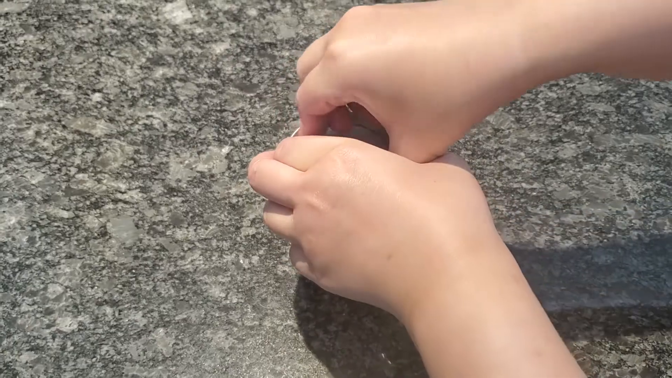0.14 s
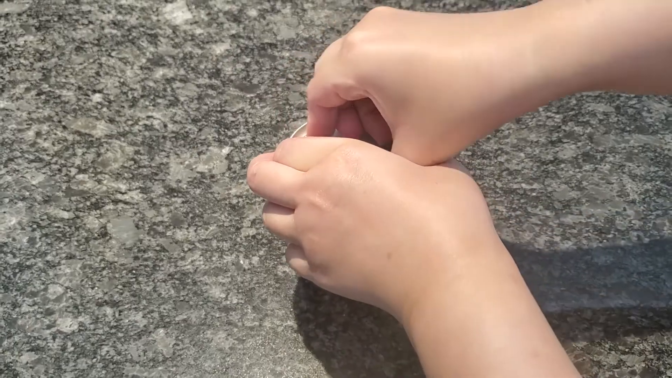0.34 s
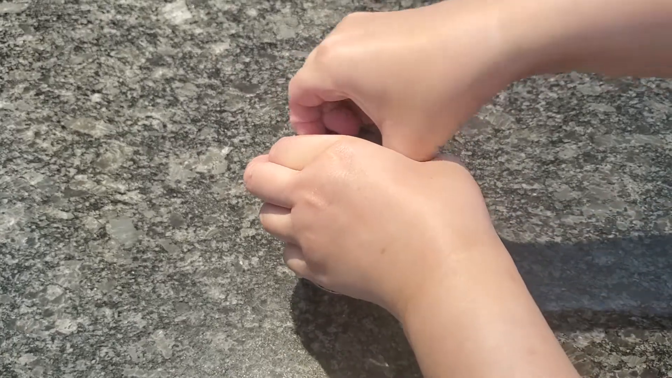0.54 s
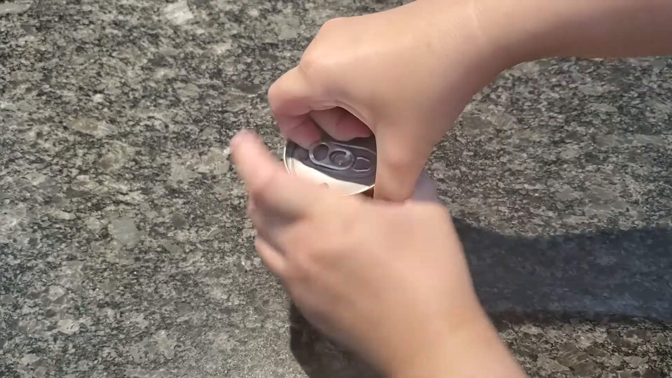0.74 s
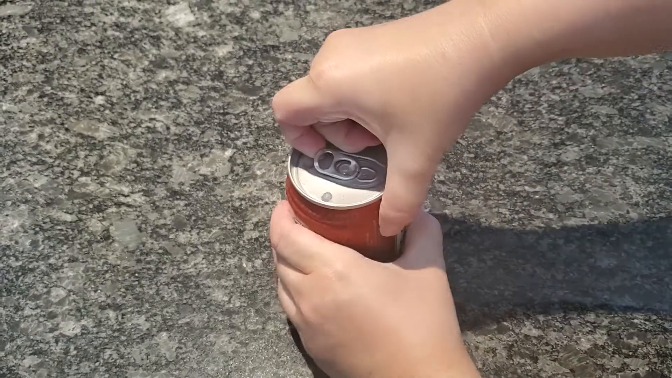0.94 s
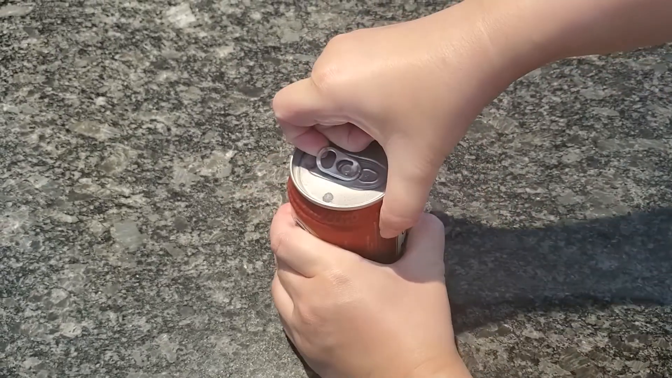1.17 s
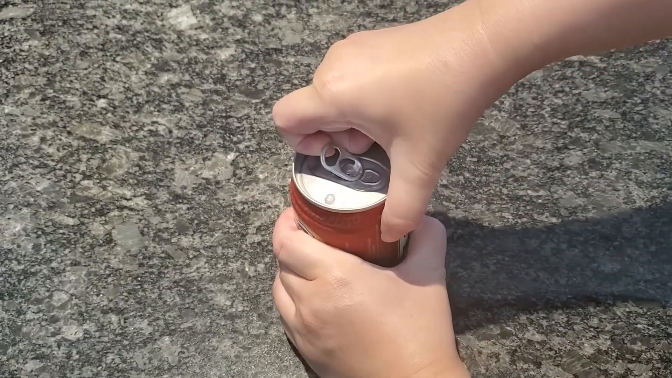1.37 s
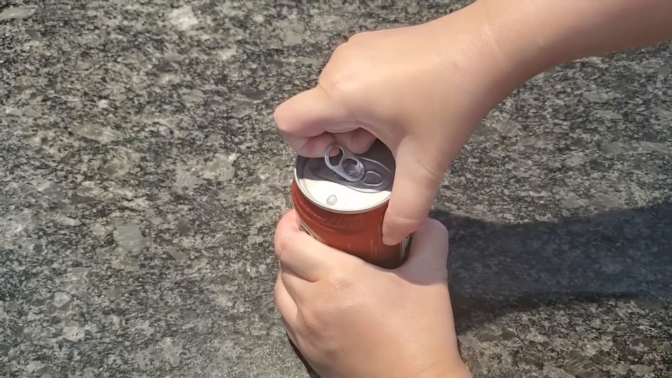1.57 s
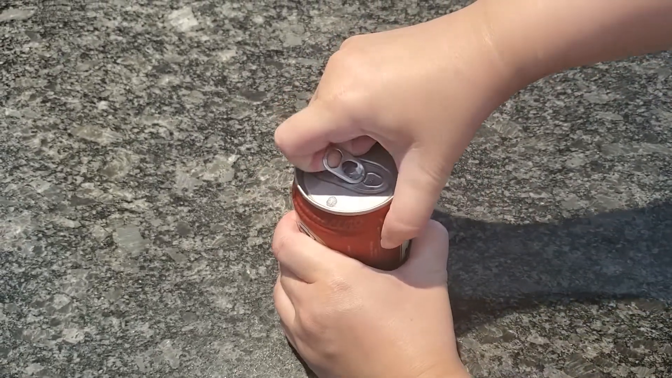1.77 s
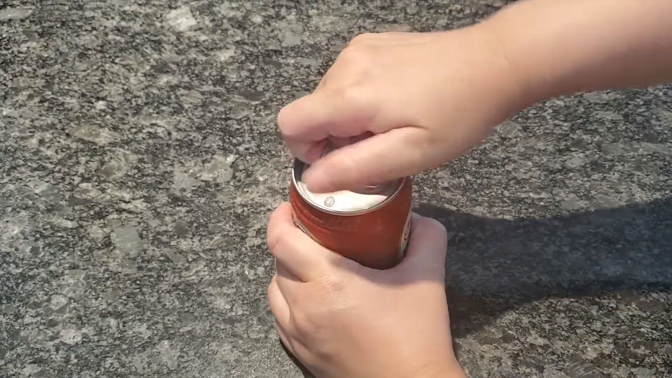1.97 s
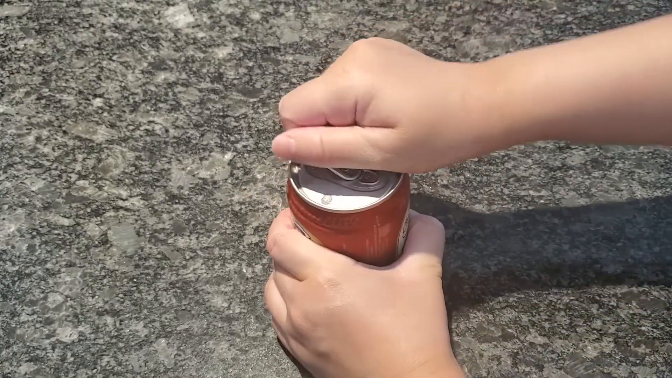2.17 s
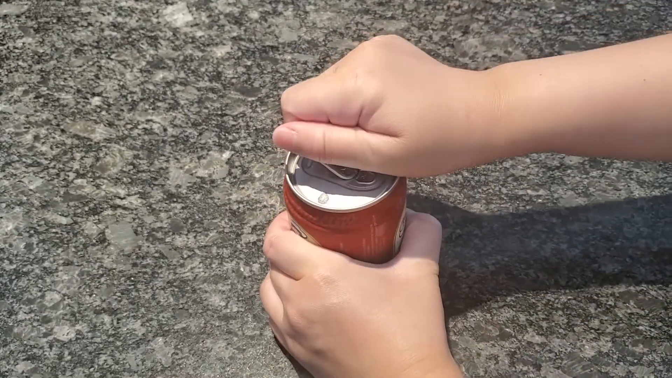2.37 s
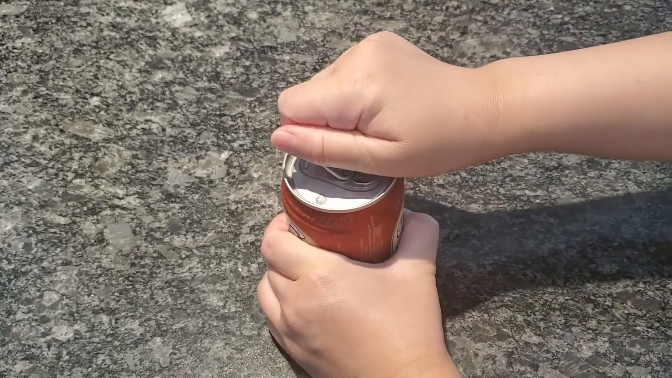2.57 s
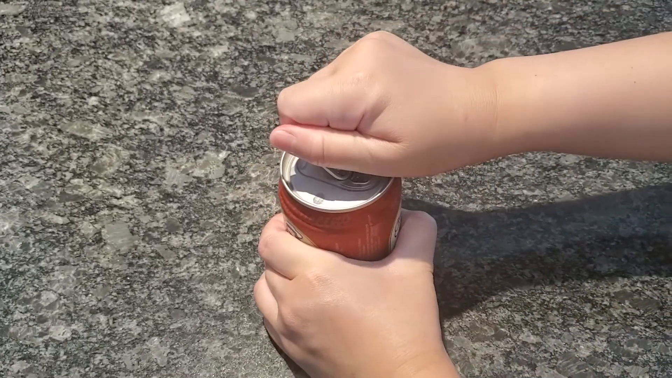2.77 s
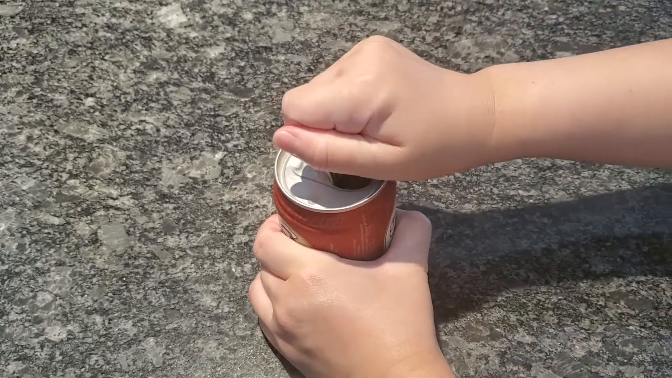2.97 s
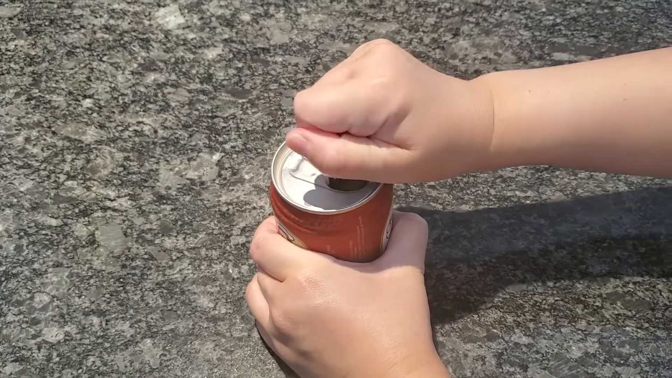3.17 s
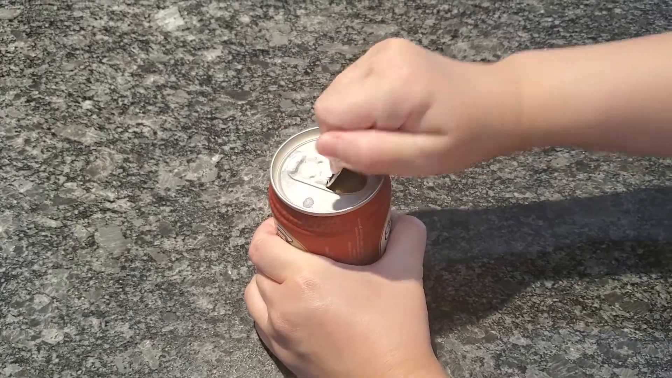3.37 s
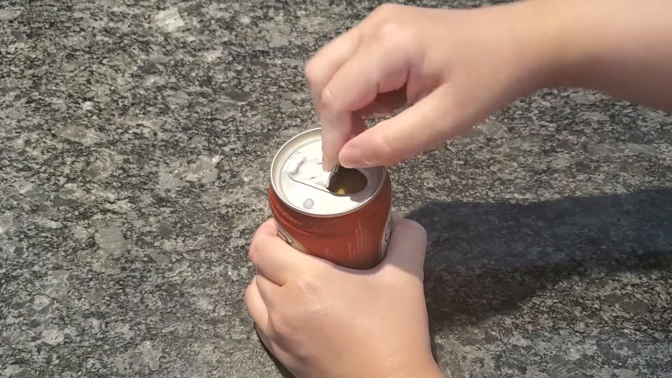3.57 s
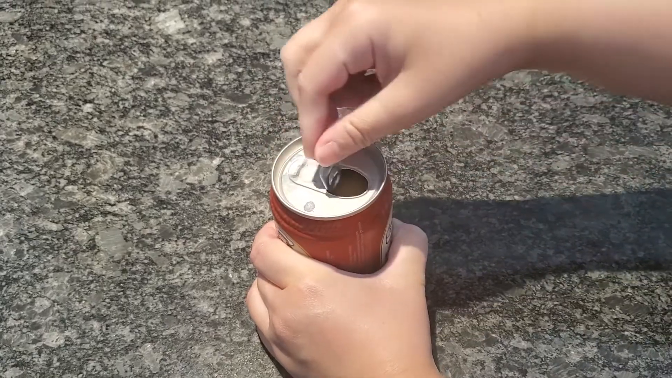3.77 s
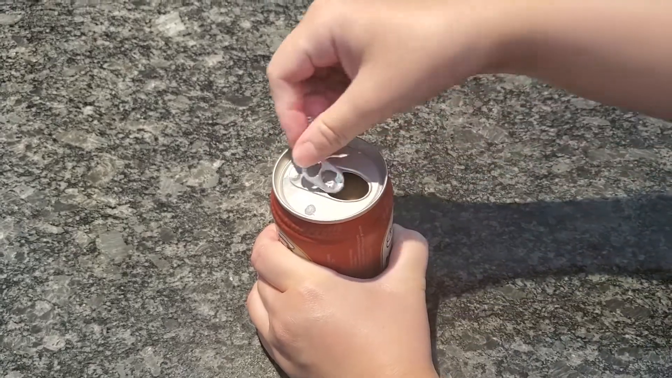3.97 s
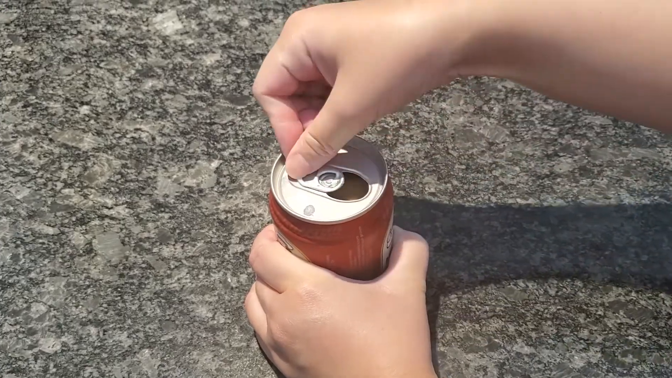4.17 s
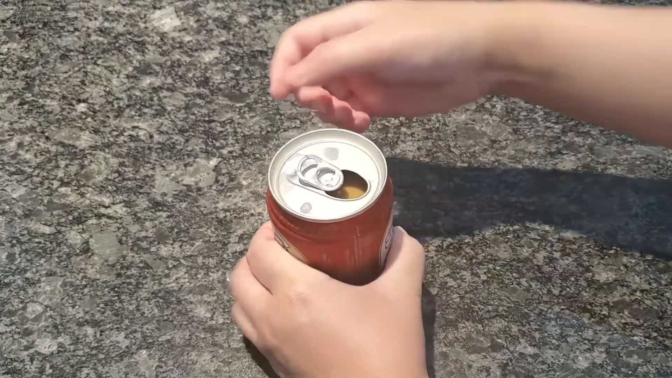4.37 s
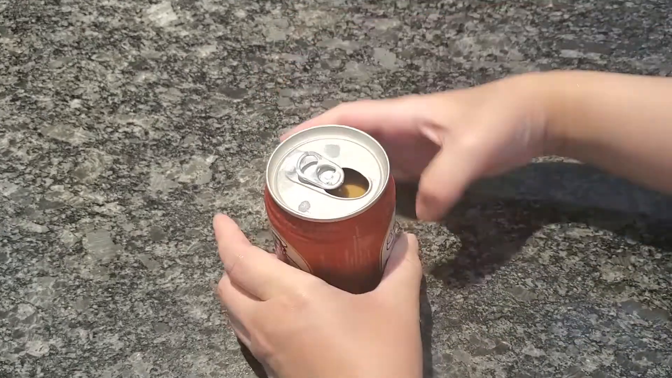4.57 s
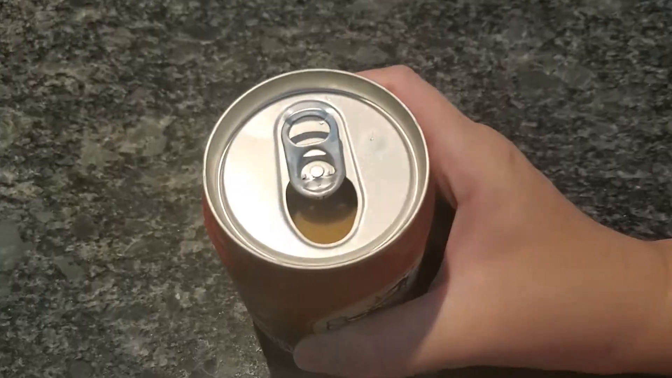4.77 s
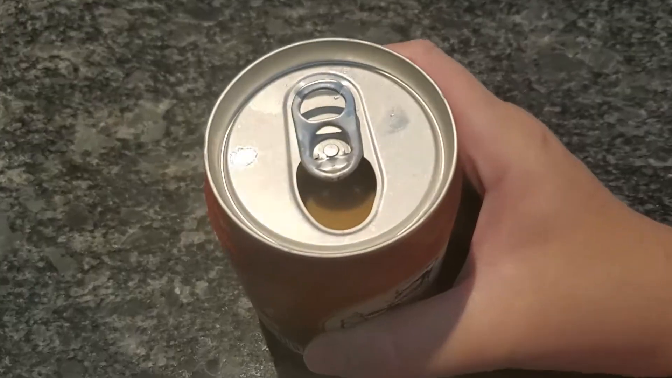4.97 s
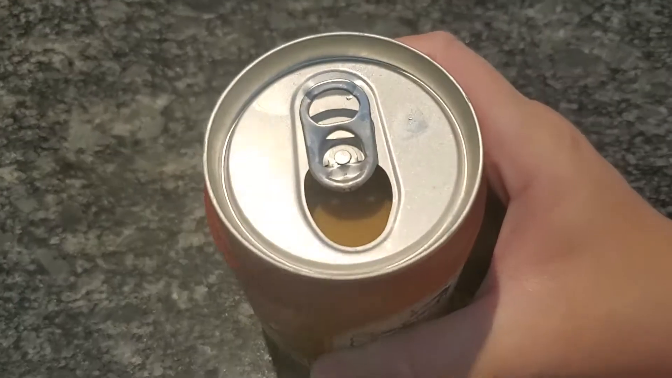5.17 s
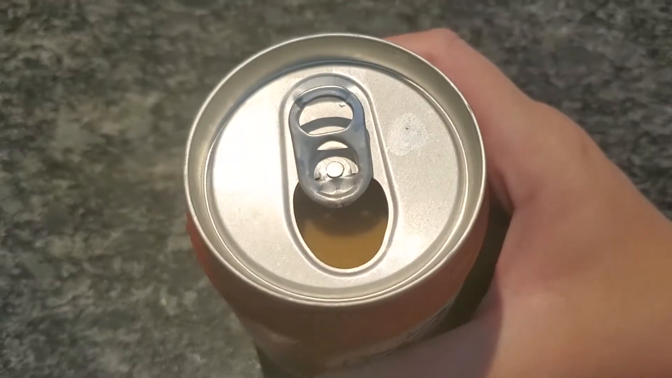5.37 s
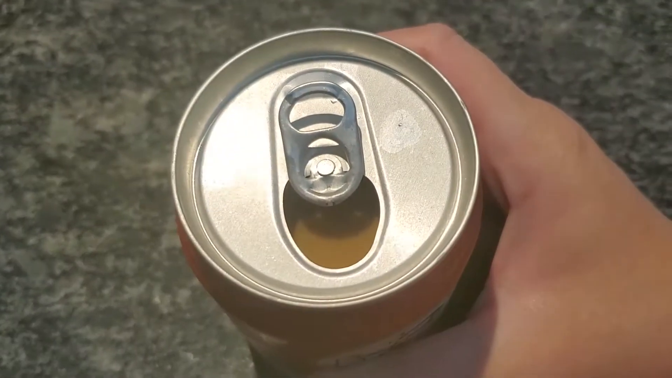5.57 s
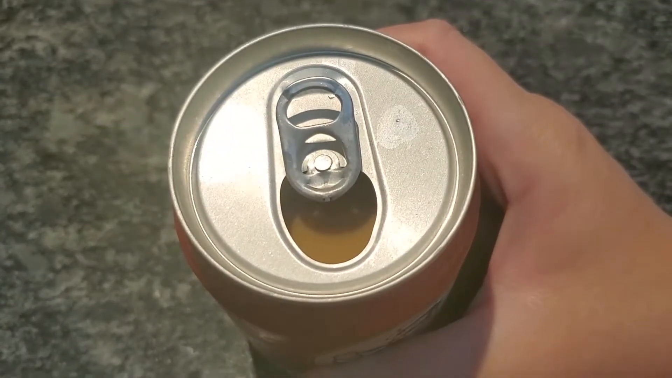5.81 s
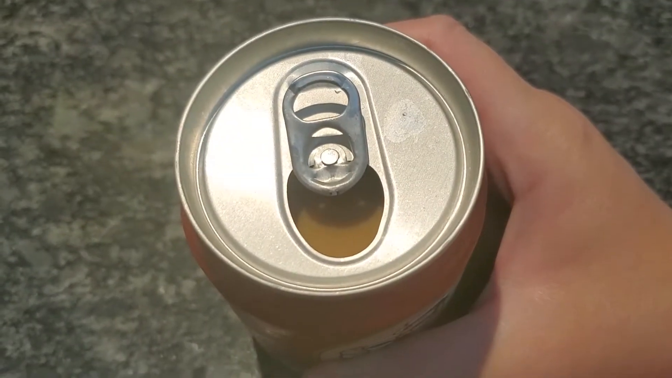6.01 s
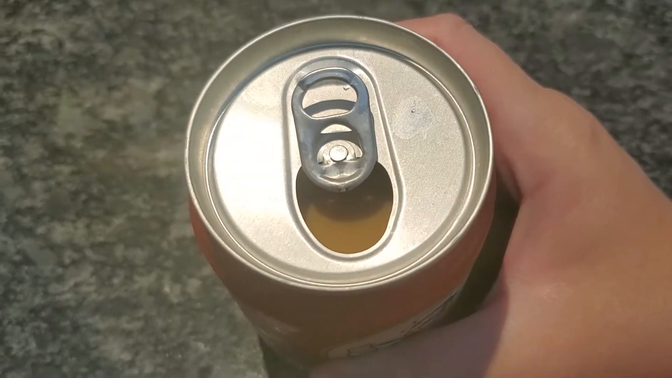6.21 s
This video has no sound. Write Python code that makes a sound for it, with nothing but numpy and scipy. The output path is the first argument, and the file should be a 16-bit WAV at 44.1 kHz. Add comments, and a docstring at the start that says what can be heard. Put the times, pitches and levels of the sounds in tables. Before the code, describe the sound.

Close stereo microphone in a hard-walled, lively room with a faint appliance hum and hiss. Fingers scrape and tap a can lid, then a sharp metallic crack releases a very short bright spit of gas. After light tab clicks, the lid tears in two quick crunching bursts, the second louder and hollow. Small tab taps and soft finger rubs follow.

```python
"""The ring-pull of a drink can is worked by hand on a stone counter in a hard-walled room.
The nail slips and taps (ringing lid modes), the seal cracks (the same modes over low dull tones) and gas spits out
(spluttering bright noise), then the scored lid tears in jerks (rough jolts over crunching noise) and folds in.
Fingers drag on the metal (grainy noise, partly resonant) and the can knocks on the stone (dull tones).
Behind it an appliance hums and hisses (steady and blurred motor tones, coloured noise)."""
import sys
import numpy as np
from scipy import signal
from scipy.fft import rfft, irfft, next_fast_len
from scipy.io import wavfile
from scipy.ndimage import map_coordinates

SR = 44100
rng = np.random.default_rng(int(sys.argv[2]) if len(sys.argv) > 2 else 0)


def digitize_waveform(pressure):
    """Quantize a signal to 16-bit integers and store it at the path in sys.argv[1].

    Rows of a 2-D input are taken as channels; values are limited to [-1, 1].
    """
    field = np.atleast_2d(pressure).T
    bounded = np.clip(field, -1, 1)
    quanta = np.round(bounded * 32767).astype(np.int16)
    wavfile.write(sys.argv[1], SR, quanta)


N = 275437
T = np.arange(N) / SR
SWELL_DB = 35  # range covered by one rise or fall
# Stereo width of the can's noises: pitch_hz, likeness of left and right (1 = the same, 0 = unrelated)
NEAR = [(1000, .95), (2500, .9), (4500, .3), (7000, .15), (12000, .1)]


def amp(db):
    """dB to gain."""
    return 10 ** (np.asarray(db) / 20)


def unit(x):
    """Scale to rms 1."""
    return x / np.sqrt(np.mean(x ** 2) + 1e-20)


def along(points, hz):
    """Read (Hz, value) points on a log frequency axis."""
    f, v = np.transpose(points)
    return np.interp(np.log(hz + 1), np.log(f + 1), v)


def wobble(rate):
    """A smooth random curve with rate knots a second."""
    return map_coordinates(rng.standard_normal(int(N * rate / SR) + 4), [T * rate])


def filtered(x, response):
    """Pass x through a complex response of frequency."""
    n = x.shape[-1]
    padded = next_fast_len(n + 4096)
    return irfft(rfft(x, padded) * response(np.fft.rfftfreq(padded, 1 / SR)), padded)[..., :n]


def modes(f, table):
    """Causal response of (Hz, width Hz, dB) resonances, alternating in sign."""
    total = 0
    for k, (hz, width, db) in enumerate(table):
        total = total + (-1) ** k * amp(db) * 1j * f * width / (hz * hz - f * f + 1j * f * width)
    return total


def spread(pair, alike):
    """Mix two unrelated signals into a left and right of a given likeness."""
    def mid_side_gains(hz):
        angle = np.arccos(np.clip(along(alike, hz), -1, 1)) / 2
        return np.array([np.cos(angle), np.sin(angle)])
    mid, side = filtered(pair, mid_side_gains)
    return np.array([mid + side, mid - side])


def noise(spectrum, alike):
    """Stereo coloured noise of rms 1."""
    pair = filtered(rng.standard_normal((2, N)), lambda hz: amp(along(spectrum, hz)))
    return unit(spread(pair, alike))


def add(out, s, sound):
    """Mix a short sound in at a time."""
    out[..., round(s * SR):][..., :sound.shape[-1]] += sound


def swell(s, db, rise, hold, fall):
    """Gain of a rise, hold and fall, straight in dB, reaching full level at s."""
    rise, hold, fall = np.clip([rise, hold, fall], 1e-4, None)
    below = np.maximum((s - T) / rise, (T - s - hold) / fall).clip(0)
    return amp(db - SWELL_DB * below)


def appliance():
    """Motor tones, some steady and some blurred, on a drone of air, and a far hiss."""
    # Blurred motor tones: pitch_hz, width_hz, relative level_db
    hum = [(58, 4.4, -72.5), (136.4, 9.7, -73.5), (182, 10, -70), (245, 19, -71), (295, 14, -67.5),
           (386, 41, -67), (468.2, 8, -77.5), (720, 50, -73.5), (909, 7.7, -79), (1240, 64, -82)]
    # Steady motor tones: pitch_hz, rms level_db before the background level is applied
    motor_tones = [(192, -67), (355.3, -61), (429, -70), (1006.5, -80.5), (1184, -79.5)]
    # Colour of the air drone, then of the hiss: pitch_hz, relative level_db (per Hz)
    drone_colour = [(15, -49.5), (25, -31), (96, -10.5), (186, -16), (308, -15), (357, -3.5), (400, -13),
                    (520, -10), (715, -15), (1080, -24.5), (1190, -26), (1380, -32.5), (2200, -49.5),
                    (2860, -76), (4840, -120)]
    hiss_colour = [(1000, -15.5), (2000, -13.5), (3600, -13), (4600, -16), (5200, -9.5), (5700, -1.5),
                   (7000, 0.5), (7500, -4.5), (8500, -3), (9200, -11), (10500, -15.5), (11800, -16),
                   (12300, -28), (14000, -21.5), (16000, -24)]
    # Stereo width of the background: pitch_hz, likeness of left and right
    background_width = [(60, 0.56), (130, 0.91), (290, 0.97), (640, -0.19), (1400, 0), (6000, .08),
                        (15000, -0.073)]
    # Typed level of the background, which dips after loud events: time_s, drone_db, hiss_db
    background_level = [(0, 1, 4), (.9, 1.5, 3), (1.4, 2, 2.5), (1.6, -0.5, 3.5), (2.5, 0, 2),
                        (3.0, 4, 4.5), (3.3, -2.5, 2), (3.75, -3, 0.5), (4.4, 1, 3), (5.2, -0.5, 4),
                        (6.25, -1, 2)]
    # A faint motor whine comes up, then settles
    whine_hz, whine_s, whine_db, whine_settles_db = 3494, 4.66, -84.5, -9.5

    def blur_response(f):
        return sum(amp(db) / w ** .5 / (1 + ((f - hz) / w) ** 2) for hz, w, db in hum)

    blur = filtered(rng.standard_normal((2, N)), blur_response)
    drone = amp(-60) * unit(spread(blur, background_width)) + amp(-63) * noise(drone_colour, background_width)
    for hz, db in motor_tones:
        drift = 0.083 * np.cumsum(wobble(12)) / SR * 2 * np.pi  # pitch wanders about 0.08 Hz
        apart = np.arccos(np.clip(along(background_width, hz), -1, 1)) * np.array([[-.5], [.5]])
        level = amp(db + 3 + 0.5 * wobble(4.1))  # +3 dB: rms to peak of a sine
        drone += level * np.sin(2 * np.pi * hz * T + drift + apart)

    whine_rise = np.interp(T - whine_s, [-.2, 0, .8], [-SWELL_DB, 0, whine_settles_db])
    whine = np.sin(2 * np.pi * whine_hz * T + [[0], [.4]])
    drone += amp(whine_rise + whine_db + 2.5 * wobble(11)) * whine

    hiss = amp(-75.5) * noise(hiss_colour, background_width)
    when, drone_db, hiss_db = np.transpose(background_level)
    drone *= amp(np.interp(T, when, drone_db)) * amp([[.6], [-.6]])  # both lean a little left
    hiss *= amp(np.interp(T, when, hiss_db)) * amp([[.4], [-.4]])
    return drone + hiss


def fingers():
    """Skin dragging over metal: grainy noise, part of it ringing through the can."""
    # Can modes rung by sliding: pitch_hz, width_hz, level_db
    scrape_modes = [(1700, 510, 6.5), (2550, 210, 0.5), (3550, 100, -3.5)]
    # Colour of the skin fizz: pitch_hz, relative level_db (per Hz)
    skin_colour = [(2500, -30.5), (4500, -7.5), (8000, -5), (12500, -1), (16000, -12)]
    # Strokes; the first row is a sound already dying away at the start:
    # full_level_s, rise_s, fall_s, body_db, pitch that rings most_hz, fizz_db
    strokes = [(0, 0.0089, 0.11, -58, 1700, -59), (.66, 0.15, 0.27, -70.5, 3380, -66.5),
               (0.831, 0.14, 0.094, -65, 2550, -63), (1.721, .25, 0.27, -71.5, 2550, -79),
               (2.09, 0.075, 0.26, -80.5, 2550, -86.5), (2.25, .3, 0.24, -75, 2550, -95),
               (2.62, 0.087, 0.042, -68.5, 2550, -73), (3.599, 0.078, .3, -82.5, 2100, -90),
               (4.079, 0.045, 0.18, -68, 3400, -85.5), (4.25, .12, 0.21, -80.5, 2097, -84),
               (4.5, 0.38, 0.41, -79.5, 2807, -83)]
    lean_db = 16  # loss of a mode an octave away from the pitch that rings most

    body = 0
    for mode in scrape_modes:
        ring = amp(mode[2]) * unit(filtered(rng.standard_normal(N), lambda f: modes(f, [mode])))
        ring_gain = 0
        for s, rise, fall, db, hz, _ in strokes:
            octaves_away = abs(np.log2(hz / mode[0]))
            ring_gain = ring_gain + swell(s, db - lean_db * octaves_away, rise, 0, fall)
        body += ring * ring_gain
    fizz_gain = sum(swell(s, db, rise, 0, fall) for s, rise, fall, _, _, db in strokes)
    fizz = fizz_gain * noise(skin_colour, NEAR)
    grain = amp(0.83 * wobble(220))
    return grain * (body + fizz)


def click(s, db, hz, upper_db, sharp_db, rough, damping, pan_db):
    """One jolt with a rough wake: it rings the lid and cracks at the rim."""
    # Short hard rim modes: pitch_hz, width_hz, level_db
    rim_modes = [(3340, 1800, -1.5), (6400, 600, 3), (8140, 670, -5)]
    # Upper lid modes: pitch_hz, offset while closed_db, offset once open_db
    overtones = [(2620, 1, -3.5), (3436, -3, 1), (4196, 1, -15)]
    # Length of the wake by strength; brushing touches and hard blows last longest: peak_db, t60_s
    wake_length = [(-60, .03), (-39, 0.0093), (-22, .012), (-5.5, .022)]
    open_s, scatter_db, pan_scatter_db = 2.9, 2.5, 0.5  # scatters: random change from blow to blow
    treble_db = -12.5  # finest crack, relative to the rim modes

    t = np.arange(SR // 12) / SR
    t60 = np.interp(db, *np.transpose(wake_length))
    wake = amp(-60 * t / t60) * (1 - np.exp(-t / .0008)) * rng.standard_normal((2, len(t)))
    wake /= np.linalg.norm(wake[0])

    width = damping * np.log(1000) / np.pi / t60
    lid_modes = [(hz, width, 0)]
    for mode_hz, closed_db, opened_db in overtones:
        offset_db = opened_db if s > open_s else closed_db
        lid_modes.append((mode_hz, 1.4 * width, upper_db + offset_db + scatter_db * rng.normal()))

    def lid_response(f):  # squared resonances swell over a few cycles
        return sum(amp(g) * modes(f, [(c, w, 0)]) ** 2 for c, w, g in lid_modes)

    def crack_response(f):
        finest = amp(treble_db) * modes(f, [(11700, 15000, 0.00031)])
        return amp(sharp_db) * (modes(f, rim_modes) + finest)

    lid = filtered((t == 0) + rough * wake, lid_response)
    crack = spread(filtered(wake, crack_response), NEAR)
    # A small lid radiates no bass
    sound = filtered(lid + crack, lambda f: (1j * f / (800 + 1j * f)) ** 2)
    pan_db += pan_scatter_db * rng.normal()
    level = amp(db + np.array([[pan_db], [-pan_db]]) / 2)
    return level * sound / np.abs(sound).max(axis=1, keepdims=True)


def taps_and_seal_crack():
    """Taps on the lid, and the seal's crack with its bounce: hard ones are choked, faint ones brushed and rough."""
    # Taps on the lid, and the seal's crack (1.2289 s) with its bounce; the lid tone is mostly lower once open:
    # start_s, peak_db (before pan), lid_pitch_hz, upper_modes_db, rim_crack_db
    lid_hits = [(0.012, -37.5, 1660, -17, -24), (0.284, -39, 1760, -13, -17.5),
                (0.291, -31, 1730, -24, -20), (0.382, -48.5, 1700, -36, -20),
                (0.628, -39.5, 1740, -33, -19.5), (1.051, -59, 1500, -18, -23),
                (1.201, -17, 1580, -7.5, -9.5), (1.2289, -5, 1600, -14.5, -16),
                (1.2373, -16, 2150, -6.5, -10), (1.487, -45, 1970, -1.5, -10), (1.515, -41, 1700, -4, -3),
                (1.534, -29, 2230, 8.5, 9.5), (1.708, -49, 1225, -26, -22), (1.726, -43, 1380, -6, -14),
                (3.056, -28, 2000, -2.5, 4), (3.228, -46.5, 1986, -7, -9), (3.248, -46, 1220, -31, -19),
                (3.534, -69, 2084, -18, -17), (3.595, -55.5, 1300, -29, -30), (3.609, -56, 1350, -23, -30),
                (3.719, -66, 1640, -19.5, -24), (4.054, -43, 1300, -18, -30), (4.058, -38, 1337, -4, -20),
                (4.214, -52.5, 1274, -10.5, -28), (4.242, -49.5, 1690, -20, -24),
                (4.624, -59, 1251, -18, -28)]
    out = np.zeros((2, N + SR))
    for s, db, hz, upper_db, sharp_db in lid_hits:
        rough = np.interp(db, [-55, -42], [2.5, .45])
        damping = np.interp(db, [-55, -42, -5], [3.5, 1.6, 4.2])
        add(out, s, click(s, db, hz, upper_db, sharp_db, rough, damping, pan_db=-5))  # left minus right
    return out[:, :N]


def thuds():
    """Dull tones that swell within half a cycle: knocks on the stone, and the low body of the seal crack."""
    # Knocks on the stone, and the low body of the seal crack (rows near 1.23 s):
    # start_s, level_db (before the onset is softened), pitch_hz, t60_s
    dull_tones = [(.29, -46.5, 816, .03), (0.299, -39, 271, 0.14), (0.33, -51, 56, 0.23),
                  (1.229, -29, 648, 0.013), (1.231, -40.5, 250, .03), (1.234, -40.5, 85, .1),
                  (2.928, -44.5, 58, 0.37)]
    out, t = np.zeros(N + SR), np.arange(SR // 2) / SR
    for s, db, hz, t60 in dull_tones:
        onset = 1 - np.exp(-t * hz / .4)
        add(out, s, amp(db - 60 * t / t60) * onset * np.sin(2 * np.pi * hz * t))
    return out[:N]


def gas():
    """The jet through the cracked seal: bright, spluttering noise."""
    # Colour of the jet: pitch_hz, relative level_db (per Hz)
    jet_colour = [(900, -40), (2000, -10.5), (5000, -12), (7000, -7.5), (9500, -9), (12000, 2.5),
                  (13200, -12.5), (14300, 1.5), (16000, -0.5)]
    burst = swell(s=1.242, db=-21, rise=0.032, hold=0.018, fall=.03)  # times in seconds
    splutter = amp(2.9 * wobble(370))
    return burst * splutter * noise(jet_colour, NEAR) * amp([[-1.5], [1.5]])  # leans right


def can_air(s, db):
    """Air in the can answers a jolt, higher and on the whole louder as the hole grows."""
    # Hollow answer: time_s, pitch_hz, level relative to the jolt_db
    hollow_path = [(2.62, 620, -25), (2.661, 680, -27), (2.87, 880, -22), (2.885, 950, -11.5)]
    q, pan_db = 2.4, 2.5  # pitch over width; left minus right
    when, pitch, under = np.transpose(hollow_path)
    hz = np.interp(s, when, pitch)
    impulse = 1. * (np.arange(SR // 12) == 0)
    hollow = filtered(impulse, lambda f: modes(f, [(hz, hz / q, 0)]) ** 2)
    level = amp(db + np.interp(s, when, under) + np.array([[.5], [-.5]]) * pan_db)
    return level * hollow / np.abs(hollow).max()


def tears():
    """The score line gives way in rough jolts that ring the lid and wake the air in the can."""
    # Jolts: start_s, peak_db (before pan), sharpness_db (level of the rim crack)
    jolts = [(2.5841, -48.5, -9.5), (2.593, -57.5, -8), (2.614, -53.5, -5), (2.621, -53, -2),
             (2.6285, -42, -4.5), (2.632, -37, -5.5), (2.6373, -27, -3), (2.641, -22.5, -1.5),
             (2.645, -18, -5), (2.651, -27, -6), (2.656, -24.5, 0), (2.664, -12.5, -6), (2.672, -25.5, -4),
             (2.689, -30.5, -4.5), (2.8, -30, -5), (2.8142, -19, -5), (2.823, -36.5, -7), (2.827, -26, -10),
             (2.832, -30.5, -7), (2.839, -21, -8.5), (2.85, -21, -13.5), (2.8567, -9, -16),
             (2.861, -11, -8), (2.869, -15, -8), (2.877, -16, -8), (2.885, -4, 3.5), (2.889, -8, 1)]
    # Lid tone climbing as the flap bends: time_s, pitch_hz (before a random change per jolt)
    lid_climb = [(2.64, 2000), (2.87, 2250)]
    upper_over_sharp_db = -2
    out = np.zeros((2, N + SR))
    for s, db, sharp_db in jolts:
        hz = np.interp(s, *np.transpose(lid_climb)) * (1 + rng.normal() / 16)
        upper_db = sharp_db + upper_over_sharp_db
        add(out, s, click(s, db, hz, upper_db, sharp_db, rough=0.74, damping=4.2, pan_db=-1.35))
        add(out, s, can_air(s, db))
    return out[:, :N]


def rip():
    """The score line keeps crunching between the large jolts: flickering coloured noise."""
    # The two pulls: full_force_s, rise_s, hold_s, level_db
    pulls = [(2.653, .03, 0.037, -38.5), (2.863, 0.051, .033, -28)]
    # Colour of the crunch: pitch_hz, relative level_db (per Hz)
    foil_colour = [(700, -38), (1300, -9), (2000, -7), (2800, -3.5), (4400, 0), (5200, -13.5), (6000, -6.5),
                   (8000, -10.5), (11000, -16), (16000, -23.5)]
    force = sum(swell(s, db, rise, hold, fall=.025) for s, rise, hold, db in pulls)
    return force * amp(3.4 * wobble(600)) * noise(foil_colour, NEAR)


def room(x):
    """A few wall echoes, then a tail whose treble dies first; a fresh random tail for every 0.1 s of sound."""
    # Decay of the tail: pitch_hz, t60_s
    tail_decay = [(300, .7), (800, .62), (2000, .54), (4000, .51), (6000, .43), (8000, .38), (11000, .33),
                  (16000, .27)]
    # Early wall echoes: delay_s, level_db
    wall_echoes = [(.0095, -13), (.0195, -16), (.006, -17), (.014, -17), (.027, -19)]
    out, step = np.zeros((2, N + 2 * SR)), SR // 10
    for start in range(0, N, step):
        hz, t, z = signal.stft(rng.standard_normal((2, SR * 3 // 4)), SR, nperseg=256)
        decay = amp(-60 * t / along(tail_decay, hz)[:, None])
        tail = signal.istft(z * decay, SR, nperseg=256)[1]
        fade_in = np.clip(np.arange(tail.shape[1]) / SR / .008, 0, 1)
        tail *= amp(-5) / np.linalg.norm(tail[0]) * fade_in
        for k, (delay, db) in enumerate(wall_echoes):
            # The right side is weaker and every other echo flips there
            tail[:, round(delay * SR) + 9 * (k % 2)] += amp(db) * np.array([1, (-1) ** k * 0.74])
        add(out, start / SR, signal.fftconvolve(x[None, start:start + step], tail, axes=1))
    return out[:, :N]


def scene():
    """The can, its room and the background."""
    can = fingers() + taps_and_seal_crack() + gas() + tears() + rip()
    echo = room(can.mean(axis=0))
    can[0] = np.roll(can[0], 2)  # the can stands a little nearer the right microphone
    return can + echo + thuds() + appliance()


def record(dry):
    """The microphone loses the deep bass; nothing is kept above the band limit."""
    top_hz = 15850  # middle of a 300 Hz wide fade-out

    def microphone(hz):
        low_cut = (1j * hz / (25 + 1j * hz)) ** 2
        return low_cut * np.clip((top_hz + 150 - hz) / 300, 0, 1) ** 2

    return filtered(dry, microphone)


dry = scene()
out = record(dry)
digitize_waveform(out)
```